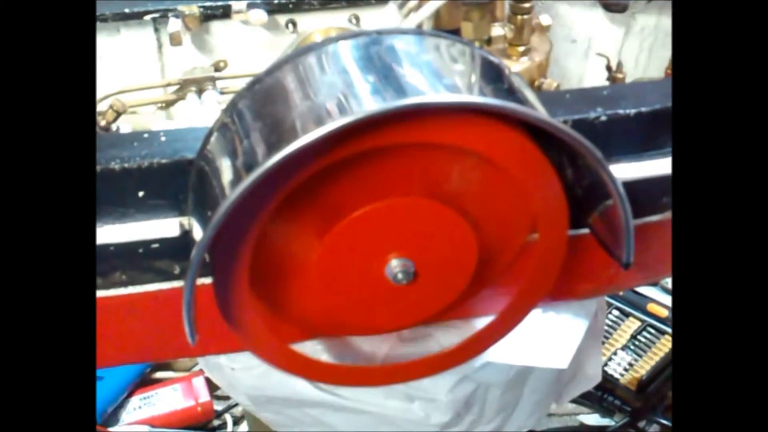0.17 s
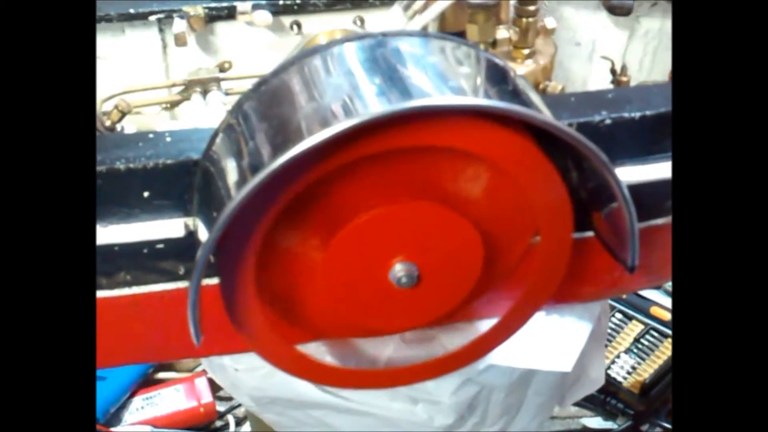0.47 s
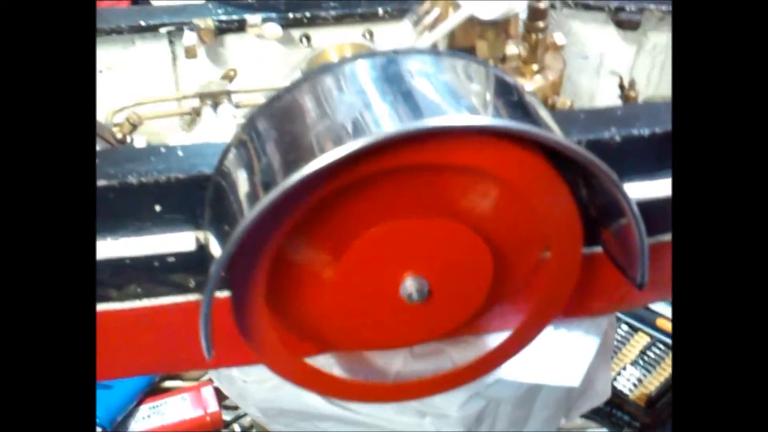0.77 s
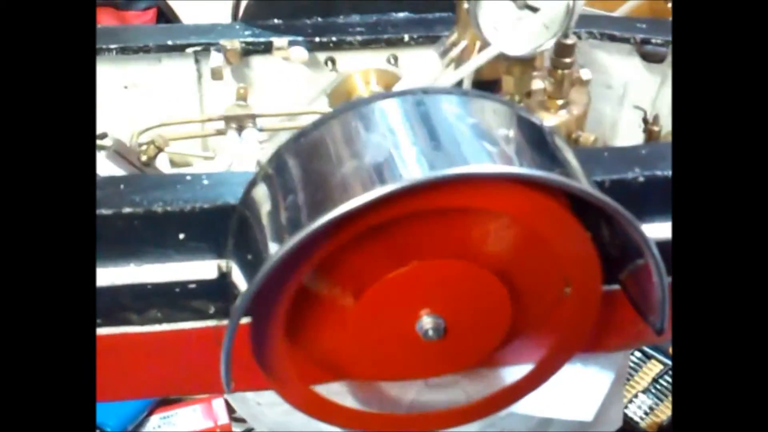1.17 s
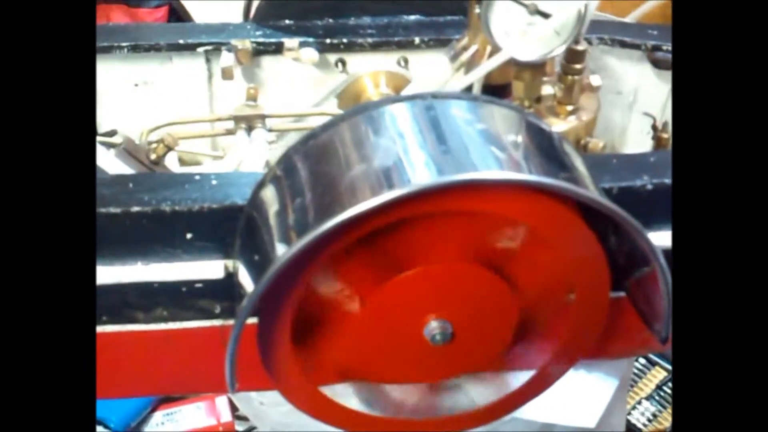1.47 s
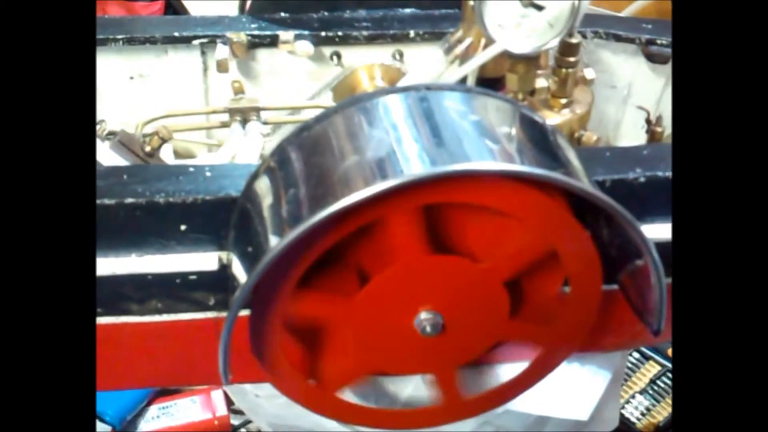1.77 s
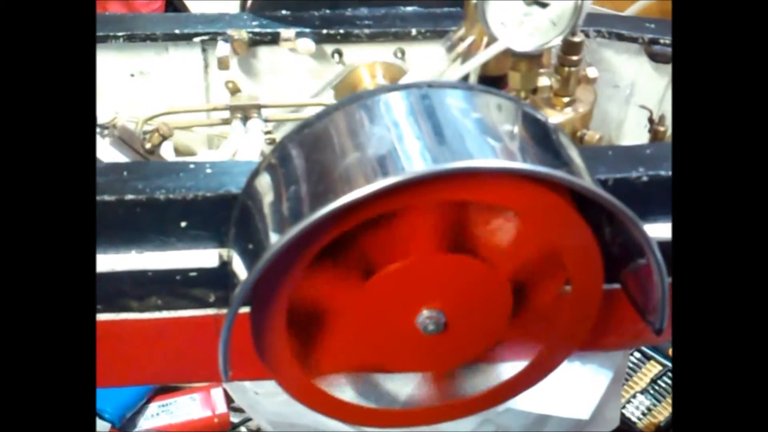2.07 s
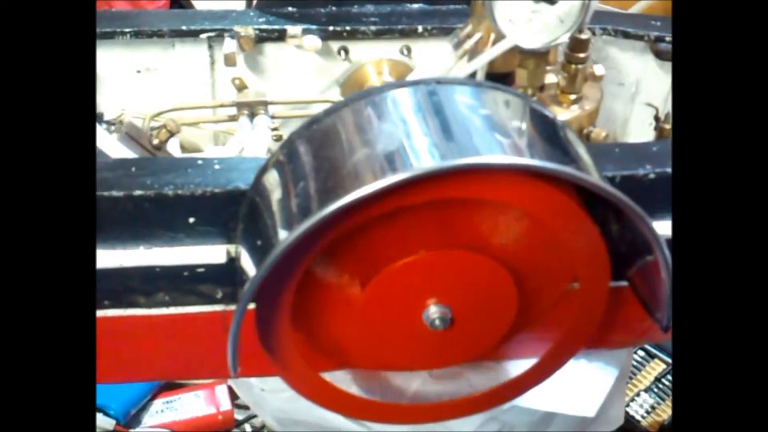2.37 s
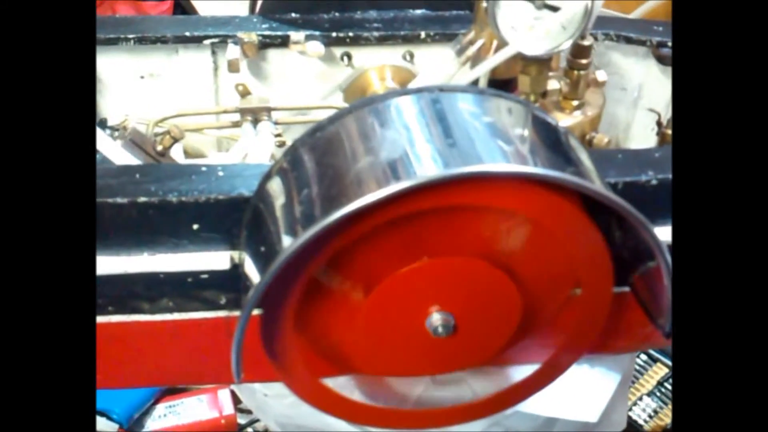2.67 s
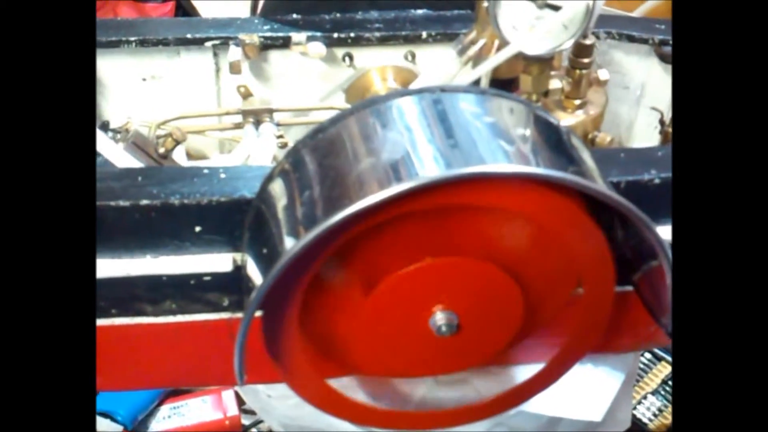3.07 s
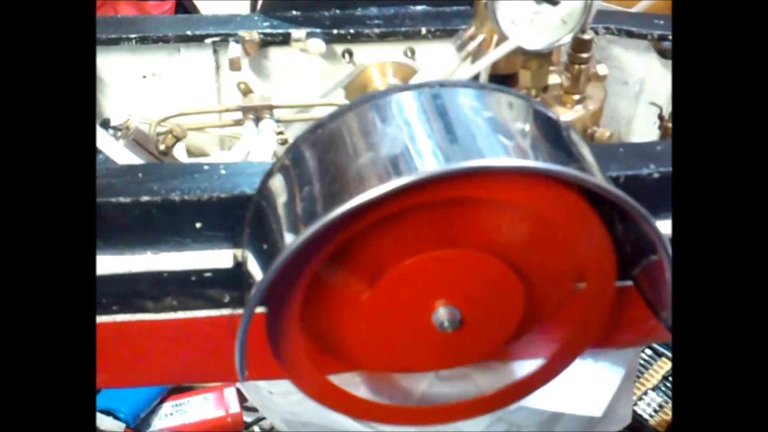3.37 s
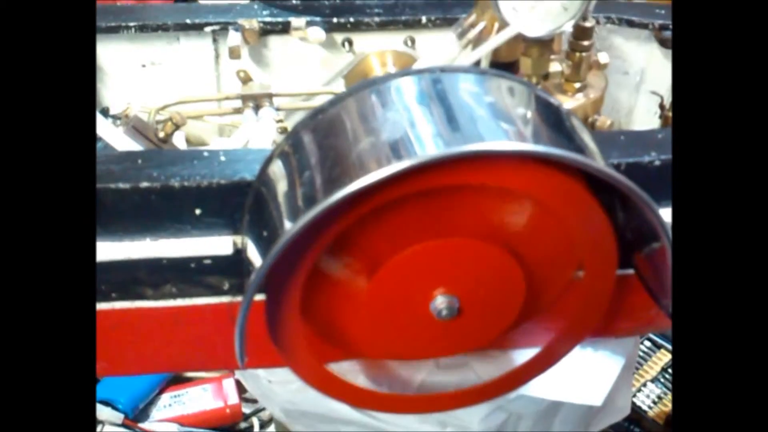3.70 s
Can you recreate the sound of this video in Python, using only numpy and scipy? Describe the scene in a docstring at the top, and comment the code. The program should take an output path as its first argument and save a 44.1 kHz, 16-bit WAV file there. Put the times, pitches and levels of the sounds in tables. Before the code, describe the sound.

Close, dry indoor sound of a miniature steam engine turning a wheel: uneven double clacks, metallic whir and rattling, burner roar throughout; knocks thin out around the middle, then return as a strong regular fast clatter.

```python
"""Indoors, close to a microphone: a small model steam engine turns a paddle wheel.
The gas burner roars as flue-coloured noise and shakes the metal frame, whose resonances are filtered noise and grains.
Steam hisses from a leak as filtered noise with droplet spits, weaker while the engine slows; loose parts rattle.
A loose linkage knocks once a stroke and a second contact follows: decaying modes plus scrape. Loudest peaks clip."""
import sys
import numpy as np
from scipy import signal
from scipy.fft import rfft, irfft, next_fast_len
from scipy.io import wavfile
from scipy.ndimage import uniform_filter1d, map_coordinates

SR = 44100
rng = np.random.default_rng(int(sys.argv[2]) if len(sys.argv) > 2 else 0)


def undo_db(level):
    """Turn decibels back into plain size, where 20 dB means ten times bigger."""
    steps = np.asarray(level, float) / 20
    return 10 ** steps


def dump_mix(stems):
    """Bounce the given channels to the path in sys.argv[1] as a 16-bit WAV at rate SR."""
    frames = np.atleast_2d(stems).T  # one column per channel
    limited = np.clip(frames, -1, 1)  # hard clip at full scale
    pcm = np.round(limited * 32767).astype(np.int16)
    wavfile.write(sys.argv[1], SR, pcm)


N = 169344

# colour of the leak's hiss and of bright ticks: (frequency [Hz], relative density [dB])
LEAK_COLOUR = [(500, -20.5), (800, 1), (1300, -6), (2000, 3.5), (3000, -6), (3500, -4.5), (4800, 0.5),
               (5600, -1), (6800, 3.5), (7500, 2), (7900, -20.5)]


def unit(x):
    """Scale to rms 1."""
    return x / np.sqrt(np.mean(x ** 2) + 1e-20)


def curve(rows):
    """Interpolate (time [s], value) rows at every sample."""
    return np.interp(np.arange(N) / SR, *np.transpose(rows))


def wobble(knots_per_s):
    """Smooth random curve through normal random knots."""
    knots = rng.standard_normal(N // 200)
    return map_coordinates(knots, [np.arange(N) * knots_per_s / SR])


def filtered(x, response):
    """Multiply the spectrum by a complex response of frequency in Hz."""
    size = next_fast_len(N + SR // 2)
    spectrum = rfft(x, size) * response(np.fft.rfftfreq(size, 1 / SR))
    return irfft(spectrum, size)[..., :N]


def shaped(x, points):
    """Colour x by (Hz, dB) points on a log-frequency axis, rms 1."""
    point_hz, point_db = np.transpose(points)

    def response(hz):
        return undo_db(np.interp(np.log(hz + 1), np.log(point_hz), point_db, left=-120, right=-120))
    return unit(filtered(x, response))


def resonant(x, peaks):
    """Sum of parallel second-order band-pass resonances (Hz, width Hz, dB), rms 1."""
    def response(hz):
        total = 0
        for k, (centre_hz, width_hz, peak_db) in enumerate(peaks):
            damping = 1j * hz * width_hz
            # alternate polarity from row to row
            total = total + (-1) ** k * undo_db(peak_db) * damping / (centre_hz ** 2 - hz ** 2 + damping)
        return total
    return unit(filtered(x, response))


def patchy(depth_db):
    """White noise with patches of random gain in time and frequency, rms 1."""
    bins = signal.stft(rng.standard_normal(N + 512), nperseg=512)[2]
    field = uniform_filter1d(rng.standard_normal(bins.shape), size=5, axis=0)
    field = uniform_filter1d(field, size=8, axis=1)
    noise = signal.istft(bins * undo_db(depth_db * unit(field)), nperseg=512)[1]
    return unit(noise[:N])


def grains(rate_per_s, scatter_db):
    """Impulses at random times with random sign and size, rms 1."""
    hit = rng.random(N) < rate_per_s / SR
    sign = np.sign(rng.standard_normal(N))
    return unit(hit * sign * undo_db(scatter_db * rng.standard_normal(N)))


def decays(events, t60_s):
    """Envelope that jumps at each (s, dB) event and decays exponentially."""
    starts = np.zeros(N + SR)
    for start_s, level_db in events:
        starts[round(start_s * SR)] += undo_db(level_db)
    return signal.lfilter([1], [1, -undo_db(-60 / (t60_s * SR))], starts[:N])


def room(x, t60_s):
    """Diffuse noise tails of two listening spots, blended as the hand-held microphone moves."""
    drift_turns_per_s = .12
    t = np.arange(SR // 3) / SR
    tails = rng.standard_normal((2, len(t))) * undo_db(-60 * t / t60_s) * (t > .002)
    tails /= np.linalg.norm(tails[0])
    here, there = signal.fftconvolve(x[None], tails, axes=1)[:, :N]
    angle = 2 * np.pi * drift_turns_per_s * np.arange(N) / SR
    return here * np.cos(angle) + there * np.sin(angle)


def burner():
    """Turbulent flame noise coloured by the flue, with a slow swell."""
    # flue colour: (frequency [Hz], relative density [dB])
    flue_colour = [(65, -80.5), (110, -45), (132, -34), (189, -19.5), (263, -14.5), (306, -6.5), (344, -14),
                   (375, -4), (402, 0), (486, -1), (660, -22), (720, -36.5), (940, -52), (1580, -120)]
    # roar before swell: (time [s], level [dB])
    roar_level = [(0, -13), (.8, -13), (1.5, -13.5), (2.2, -14.5), (3.1, -13), (3.84, -13)]
    flicker_db, swell_db = .5, .3
    level_db = curve(roar_level) + swell_db * wobble(3.9)
    return undo_db(level_db) * shaped(patchy(flicker_db), flue_colour)


def frame():
    """Flame noise and tiny bearing contacts excite the frame's resonances."""
    # frame modes: (frequency [Hz], width [Hz], relative gain [dB])
    frame_modes = [(730, 25, -5.5), (922.3, 39.5, 1), (1010, 82, -3), (1089, 65, 0), (1260, 47, -8),
                   (1468, 190, -7), (1695, 48, -16.5), (1840, 22, -16), (1990, 89, -8.5), (2299, 70, -4),
                   (2186, 52, -11), (2406, 140, -4), (2606, 140, -0.5), (2678, 120, -3.5), (2834, 40, -6),
                   (2905, 57, -4.5), (3730, 78, -6.5), (3803, 30, -6.5), (3995, 72, -3), (4340, 410, -13),
                   (6800, 76, -7.5)]
    # frame sound before offset and wobble: (time [s], relative level [dB])
    whir_level = [(0.05, -21.5), (0.51, -23.5), (0.98, -21), (1.24, -21), (2.26, -23), (3.3, -23),
                  (3.8, -22)]
    offset_db, wobble_db = 1, .83
    contacts = grains(rate_per_s=1500, scatter_db=1.5)
    drive = patchy(depth_db=1.5) + undo_db(2) * contacts
    level_db = curve(whir_level) + offset_db + wobble_db * wobble(8.6)
    return undo_db(level_db) * resonant(drive, frame_modes)


def steam():
    """Leaking steam: wide turbulent hiss with small droplet spits."""
    # hiss before offset and wobble: (time [s], relative level [dB])
    steam_level = [(0, -29.5), (.5, -28), (.82, -25), (.92, -25.5), (1.06, -28.5), (1.3, -30), (1.45, -35),
                   (1.65, -35), (1.85, -32), (2.3, -32), (2.6, -28.5), (2.9, -26.5), (3.4, -27),
                   (3.84, -25.5)]
    offset_db, wobble_db, spit_db = 5.5, .32, -15
    spits = grains(rate_per_s=420, scatter_db=3.5)
    drive = patchy(depth_db=1.5) + undo_db(spit_db) * spits
    level_db = curve(steam_level) + offset_db + wobble_db * wobble(15)
    return undo_db(level_db) * shaped(drive, LEAK_COLOUR)


def rattle():
    """Loose play gives irregular resonant ticks; the clear ones are short bright noise bursts."""
    # dense rattle before wobble: (time [s], level [dB])
    rattle_level = [(0, -25.5), (.4, -23.5), (.75, -23.5), (.84, -21), (.92, -19.5), (1.05, -28),
                    (1.5, -34), (2.2, -27), (2.7, -23.5), (3.84, -24.5)]
    # colour of the dense ticks: (frequency [Hz], width [Hz], relative gain [dB])
    tick_modes = [(758, 57, 6), (960, 74, 5), (1060, 140, 3.5), (1990, 800, -3.5), (2766, 710, 1.5),
                  (4200, 2700, -4), (5680, 2400, -3.5)]
    # clear bright ticks: (time [s], relative level [dB])
    clear_ticks = [(0.3643, -10), (0.5716, -10.5), (0.6295, -14), (0.7422, -12.5), (0.9083, -7.5),
                   (1.1494, -15.5), (1.1958, -9), (2.3827, -13)]
    wobble_db, clear_db, clear_t60_s = 2.1, -1, .025
    ticks = resonant(grains(rate_per_s=260, scatter_db=4), tick_modes)
    dense = undo_db(curve(rattle_level) + wobble_db * wobble(6.9)) * ticks
    bright = decays(clear_ticks, clear_t60_s) * shaped(rng.standard_normal(N), LEAK_COLOUR)
    return dense + undo_db(clear_db) * bright


def linkage():
    """Each stroke takes up slack with a knock, then a second, brighter contact; both ring and scrape."""
    # knocks: (time [s], relative level [dB], second contact re first [dB])
    knock_table = [(0.0225, -12.5, -10), (0.131, -11.5, -11.5), (0.221, -11, -4), (0.3, -10.5, -6),
                   (0.3617, -22, 2.5), (0.4208, -17, -13.5), (0.5013, -9.5, -7), (0.5657, -15.5, 4),
                   (0.629, -15.5, -19), (0.6827, -10, -11.5), (0.856, -14, -6), (0.9045, -6, -16),
                   (0.9604, -11.5, -0.5), (1.0728, -12.5, -9.5), (1.1361, -3, -17), (1.1963, -17, -10),
                   (1.212, -5.5, -10.5), (1.2748, -10.5, -0.5), (1.6796, -17, -17), (1.7524, -23, -12.5),
                   (1.894, -19.5, -13.5), (2.167, -21.5, -6), (2.205, -10, -11), (2.2605, -18.5, -11),
                   (2.3345, -26, -12), (2.3833, -8.5, -10), (2.4114, -15, -10.5), (2.4409, -13.5, -4),
                   (2.4985, -7.5, -4), (2.5682, -14, -13), (2.597, -7.5, -1), (2.6846, -3, -9),
                   (2.767, -8, -0.5), (2.8424, -12, 1), (2.9144, -6.5, -1.5), (2.982, -4, -4.5),
                   (3.0537, -6, -12), (3.1232, -6, -7.5), (3.1875, -3.5, -9.5), (3.256, -10.5, -7.5),
                   (3.321, -5.5, -3.5), (3.3871, -6, -12), (3.4529, -5, -11.5), (3.5158, -8, -3),
                   (3.5822, -6.5, -10), (3.6467, -2.5, -10.5), (3.711, -3.5, -5.5), (3.778, -5, -18)]
    # modes, the lowest builds up slowly in the base plate:
    # (frequency [Hz], relative level [dB], t60 [s], rise time constant [s])
    link_modes = [(1085, -8, .08, .012), (1545, 2, .06, .0008), (1640, -6, .045, .0004),
                  (1850, -3, .04, .0002), (2030, -9, .03, .0002), (2285, -3, .05, .0002),
                  (2560, -5, .035, .0002), (3064, -11, .03, .0002)]
    # scrape colour: (frequency [Hz], width [Hz], relative gain [dB])
    scrape_modes = [(1700, 360, -1.5), (2286, 340, -2.5), (2980, 490, -12.5), (6200, 1800, 2.5)]
    knock_db, scrape_db, scrape_t60_s = -6.5, -7, .04
    level_scatter_db, pitch_scatter, phase_scatter_rad = 1.5, .022, .35  # per mode and blow; pitch as share
    second_s, second_spread_s, second_tilt_db_per_oct = .0125, .002, 5

    out, t, contacts = np.zeros(N + SR), np.arange(SR // 8) / SR, []
    hz, mode_db, t60_s, rise_s = (column[:, None] for column in np.transpose(link_modes))
    tilt_db = second_tilt_db_per_oct * np.log2(hz / 1500)
    for first_s, first_db, second_db in knock_table:
        late_s = first_s + abs(second_s + second_spread_s * rng.standard_normal())
        contacts += [(first_s, first_db), (late_s, first_db + second_db)]
        for start_s, gain_db in ((first_s, 0 * hz), (late_s, second_db + tilt_db)):
            level_vary, pitch_vary, phase_vary = rng.standard_normal((3, len(link_modes), 1))
            decay = undo_db(mode_db + gain_db + level_scatter_db * level_vary - 60 * t / t60_s)
            phase = 2 * np.pi * hz * (1 + pitch_scatter * pitch_vary) * t + phase_scatter_rad * phase_vary
            ring = decay * np.sin(phase) * (1 - np.exp(-t / rise_s))
            out[round(start_s * SR):][:len(t)] += undo_db(first_db + knock_db) * ring.sum(0)
    scrape = decays(contacts, scrape_t60_s) * resonant(rng.standard_normal(N), scrape_modes)
    return out[:N] + undo_db(knock_db + scrape_db) * scrape


def scene():
    """All sources reach one microphone, copied to two equal channels."""
    near_db, room_db = -9, -18
    knocks = linkage()
    airy = steam() + rattle() + frame()
    # table and nearby walls colour the steady sounds
    near = airy + undo_db(near_db) * room(airy, t60_s=.08)
    near /= np.sqrt(1 + undo_db(2 * near_db))
    mix = burner() + near + knocks + undo_db(room_db) * room(knocks, t60_s=.15)
    return np.tile(mix, (2, 1))


def top_cut(x):
    """Nothing passes above the cut-off."""
    return signal.sosfilt(signal.butter(12, 8340, fs=SR, output="sos"), x)


def record(dry):
    """Peaks are rounded, steep bass and treble cuts follow, then the very top clips."""
    soft_level, knee, clip_level = 1.2, 17, .99
    low_hz, top_hz, edge_hz = 140, 7610, 7850

    def band_response(hz):
        bass_cut = 1 / np.sqrt(1 + (low_hz / (hz + 1)) ** 24)
        treble_cut = 1 / np.sqrt(1 + (hz / top_hz) ** 90)
        return bass_cut * treble_cut * np.where(hz < edge_hz, 1, .05)
    soft = dry / (1 + np.abs(dry / soft_level) ** knee) ** (1 / knee)
    band = filtered(soft, band_response)
    return top_cut(np.clip(band, -clip_level, clip_level))


dry = scene()
out = record(dry)
dump_mix(out)
```